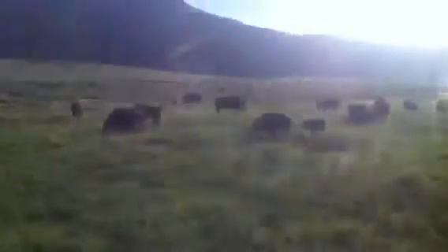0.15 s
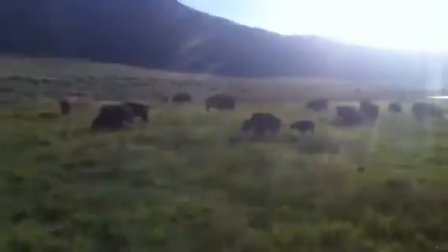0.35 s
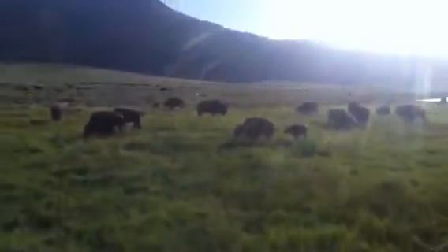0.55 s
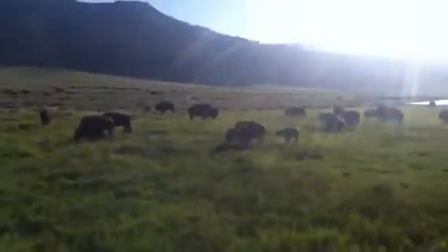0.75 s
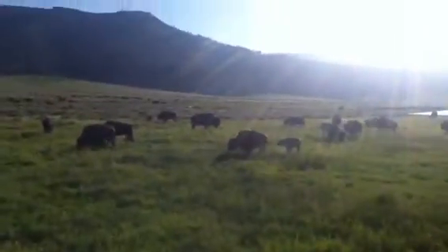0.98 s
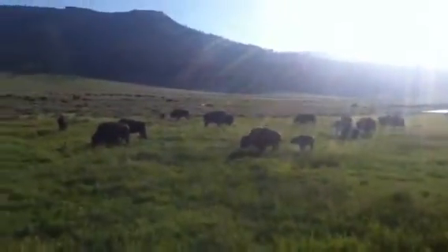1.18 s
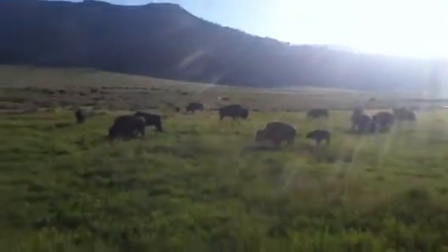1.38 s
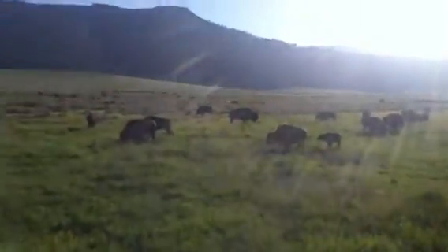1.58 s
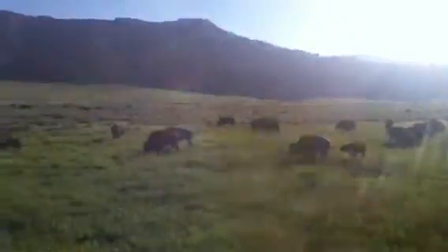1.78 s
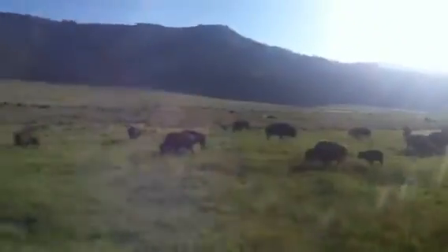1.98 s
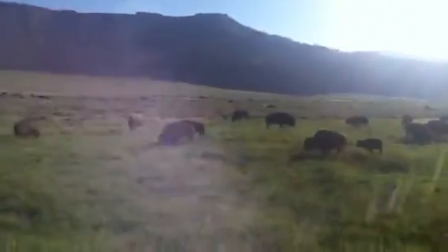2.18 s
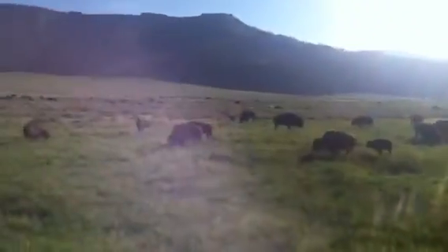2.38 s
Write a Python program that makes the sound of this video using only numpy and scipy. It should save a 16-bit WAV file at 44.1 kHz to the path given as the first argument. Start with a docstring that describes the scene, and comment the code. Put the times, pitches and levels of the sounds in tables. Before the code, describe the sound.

One deep, throaty grunt from a bison stands out on an open grassy plain. Soft bumps and faint rustles on the hand-held microphone come first, and a steady wind hiss carries on after the call.

```python
"""Open plain: a bison gives one low, rattling grunt over a steady hiss of wind in the grass.
Slow beats of its vocal folds set a deep airway resonance booming and crack through the throat;
mid-call the cracks double. Wind rumble, soft thumps and a little rustle reach the hand-held
microphone, and the recorder whines faintly."""
import sys
import numpy as np
from scipy import signal
from scipy.fft import rfft, irfft
from scipy.io import wavfile
from scipy.ndimage import uniform_filter1d

SR = 44100
rng = np.random.default_rng(int(sys.argv[2]) if len(sys.argv) > 2 else 0)


def file_out(sig):
    """Save sig as 16-bit WAV at sys.argv[1]."""
    # one column per channel
    cols = np.atleast_2d(sig).T
    # limit, then scale
    lim = np.clip(cols, -1, 1)
    pcm = np.round(lim * 32767).astype(np.int16)
    wavfile.write(sys.argv[1], SR, pcm)


N = 108045


def amp(db):
    """Decibels to gain."""
    return 10 ** (np.asarray(db) / 20)


def unit_rms(x):
    """Scale to an rms of one."""
    return x / np.sqrt(np.mean(x ** 2) + 1e-20)


def curve(points, t, column=1):
    """One column of a time table, interpolated at t."""
    rows = np.array(points)
    return np.interp(t, rows[:, 0], rows[:, column])


def colour(spectrum, hz):
    """Gain of a spectrum table at hz, interpolated over log frequency."""
    f, db = np.transpose(spectrum)
    return amp(np.interp(np.log(hz + 1), np.log(f + 1), db))


def noise(spectrum):
    """Steady coloured noise, unit rms."""
    white = rfft(rng.standard_normal(N))
    return unit_rms(irfft(white * colour(spectrum, np.fft.rfftfreq(N, 1 / SR)), N))


def ramp(u):
    """Smooth step from 0 to 1."""
    return np.sin(np.pi / 2 * np.clip(u, 0, 1)) ** 2


def swell(t, centre_s, db, half_s):
    """Gaussian envelope, down to 1/e at half_s from its peak."""
    return amp(db) * np.exp(-((t - centre_s) / half_s) ** 2)


def grass_wind(t):
    """Wind hisses in the grass; patches of its spectrum drift and the level flickers."""
    # hiss spectrum: f/Hz, level/dB
    spectrum = [(20, -18.5), (90, 3), (123, -7.5), (165, 2.5), (215, -3), (280, -6.5), (480, -12),
                (680, -10), (1020, -14.5), (1500, -17.5), (2800, -20), (4500, -25.5), (8000, -27.5),
                (11000, -32), (13500, -36), (15700, -41)]
    # wind strength: t/s, level/dB
    strength = [(0, -45), (.35, -44), (1.6, -44), (2.0, -45.5), (2.45, -45.5)]
    bands = signal.stft(noise(spectrum), nperseg=512, noverlap=384)[2]
    patches = uniform_filter1d(rng.standard_normal(bands.shape), size=9, axis=0)
    patch_db = 0.98 * unit_rms(uniform_filter1d(patches, size=24, axis=1))
    flicker_db = 0.95 * unit_rms(uniform_filter1d(rng.standard_normal(bands.shape[1]), size=10))
    hiss = signal.istft(bands * amp(patch_db + flicker_db), nperseg=512, noverlap=384)[1][:N]
    return unit_rms(hiss) * amp(curve(strength, t))


def wind_rumble(t):
    """Wind rumbles on the microphone."""
    # rumble spectrum: f/Hz, level/dB
    spectrum = [(20, -33), (50, 8), (85, 9), (140, 15.5), (220, -27), (1500, -89)]
    # rumble strength: t/s, level/dB
    strength = [(0, -63), (.3, -49), (.7, -45), (.82, -73), (1.0, -46.5), (1.35, -43), (1.7, -56.5),
                (2.45, -60)]
    return noise(spectrum) * amp(curve(strength, t))


def handling(t):
    """The hand on the microphone: dull pushes of a cycle or two, light rustles, one thin squeak."""
    # thumps: t/s, peak level/dB, f/Hz, half length/s
    pushes = [(.097, -32, 128, 0.0051), (.228, -28.5, 109, 0.0065), (.312, -30, 139, 0.0041),
              (.342, -23.5, 118, 0.0045), (0.353, -32, 65, 0.007), (0.471, -27.5, 73, 0.011),
              (0.691, -33, 116, 0.0054), (0.719, -28, 88, 0.0065), (0.901, -36, 102, 0.0052),
              (0.933, -31.5, 112, 0.0085), (0.953, -23.5, 126, 0.0033), (.988, -35, 98, 0.019),
              (1.05, -30, 90, 0.0097)]
    # rustles: t/s, level/dB, half length/s
    rustles = [(0.2, -58, .008), (0.23, -58, .007), (0.318, -50.5, 0.0037), (0.356, -52, 0.027),
               (0.434, -52.5, 0.018), (.635, -59, .008)]
    # rustle spectrum: f/Hz, level/dB
    spectrum = [(1000, -16), (3000, 3), (6700, 1), (9000, -1), (15000, -29)]
    thumps = sum(-swell(t, at_s, db, half_s) * np.cos(2 * np.pi * hz * (t - at_s))
                 for at_s, db, hz, half_s in pushes)
    rustle = noise(spectrum) * sum(swell(t, *row) for row in rustles)
    squeak = swell(t, centre_s=.355, db=-60, half_s=.028) * np.sin(2 * np.pi * 11902 * t)
    return thumps + rustle + squeak


def surroundings(x):
    """Add one close, inverted reflection and a short, thin scatter of echoes."""
    bounce_s, bounce_db = .0038, -11
    echo_rise_s, echo_t60_s, echo_db = .0051, .073, -16
    t = np.arange(SR // 2) / SR
    tail = rng.standard_normal(len(t)) * ramp(t / echo_rise_s) * amp(-60 * t / echo_t60_s)
    echoes = signal.fftconvolve(x, tail / np.linalg.norm(tail))[:N]
    bounce = np.r_[np.zeros(round(bounce_s * SR)), x][:N]
    return x - amp(bounce_db) * bounce + amp(echo_db) * echoes


def fold_closings():
    """Closing times of the vocal folds: the main beats, and the points halfway between."""
    # fold beat rate: t/s, f/Hz
    rate = [(1.0184, 40.8), (1.0664, 40.8), (1.0844, 18.7), (1.1014, 43), (1.16, 44.1), (1.22, 42.3),
            (1.28, 41.5), (1.325, 38.7), (1.36, 35.7), (1.44, 26)]
    t = np.arange(rate[0][0], rate[-1][0], 1 / SR)
    turns = np.cumsum(curve(rate, t)) / SR
    times_s = np.interp(np.arange(0, turns[-1], .5), turns, t)
    return times_s[::2], times_s[1::2]


def throat_response(size=16384):
    """One closing heard through the throat: a sharp crack that rings on in its resonances."""
    # broad throat spectrum: f/Hz, level/dB
    spectrum = [(150, -17), (350, -14), (550, -3), (650, 1), (1400, -4), (1580, -17), (1800, -9),
                (2200, -18), (2650, -14.5), (3100, -26), (3600, -19), (6000, -60)]
    # narrow resonances: f/Hz, lift/dB, width/Hz
    rings = [(473, 7, 40), (660, 5, 42), (716, 4, 22), (772, 6, 28), (895, 1, 12), (966, 8.5, 38),
             (1148, 4, 150), (1876, 7, 34), (2550, 5.5, 170)]
    hz = abs(np.fft.fftfreq(size, 1 / SR))
    lift_db = sum(db / (1 + (2 * (hz - centre) / width) ** 2) for centre, db, width in rings)
    log_gain = np.log(colour(spectrum, hz) * amp(lift_db))
    minimum_phase = np.exp(np.conj(signal.hilbert(log_gain)))
    response = np.fft.ifft(minimum_phase).real
    return response / abs(response).max()


def airway_boom(t, beats_s):
    """Each beat pulls the deep airway resonance toward its step; it rings until the next cuts in."""
    # airway resonance: t/s, f/Hz, level/dB
    resonance = [(.99, 151, -41), (1.03, 167, -33.5), (1.047, 162.5, -25), (1.08, 179, -21.5),
                 (1.115, 198, -30), (1.155, 188, -25.5), (1.185, 180, -30.5), (1.22, 191, -28),
                 (1.28, 190.2, -24), (1.335, 173, -28.5), (1.38, 167.7, -27.5), (1.425, 161.4, -30.5),
                 (1.465, 138, -37)]
    # phase reset by a beat: t/s, share/0-1
    grip = [(1.125, 1), (1.145, .1), (1.195, .15), (1.215, 1)]
    rise_s, fall_s, t60_s, lead_s, lowpass_hz = .015, .015, .35, .0043, 272
    turns = np.cumsum(curve(resonance, t)) / SR
    # one extra beat at each end
    edges_s = np.r_[2 * beats_s[0] - beats_s[1], beats_s, 2 * beats_s[-1] - beats_s[-2]] - lead_s
    boom, lag_turns = np.zeros(N), 0
    for start, end in zip(edges_s, edges_s[1:]):
        gate = ramp((t - start) / rise_s) * ramp(1 - (t - end) / fall_s)
        decay = amp(-60 * np.maximum(t - start, 0) / t60_s)
        slip_turns = (np.interp(start, t, turns) - lag_turns + .5) % 1 - .5
        lag_turns += curve(grip, start) * slip_turns
        boom += gate * decay * np.sin(2 * np.pi * (turns - lag_turns))
    boom *= np.sqrt(2) * amp(curve(resonance, t, column=2))
    return signal.sosfiltfilt(signal.butter(4, lowpass_hz, fs=SR, output="sos"), boom)


def throat_rasp(t, beats_s, halfway_s):
    """Snapping folds and puffs of air excite the throat; at the call's height the puffs fizz."""
    # sharpness of the main closings: t/s, relative level/dB
    sharpness = [(1.018, -5), (1.043, -3), (1.068, -10), (1.101, -1.5), (1.124, -13), (1.147, 3.5),
                 (1.17, -5), (1.193, 0), (1.216, -6), (1.24, -2), (1.264, -4), (1.288, -11), (1.313, -5),
                 (1.339, -9), (1.366, -1.5), (1.395, -20)]
    # extra closings halfway between: t/s, relative level/dB
    doubling = [(1.03, -19), (1.08, -11), (1.113, -16), (1.159, -6), (1.181, -2), (1.228, -.5),
                (1.252, -1.5), (1.276, -11), (1.3, -19)]
    # air rushing through the throat: t/s, level/dB
    airflow = [(.96, -77), (.99, -53), (1.15, -48.5), (1.29, -46), (1.38, -54.5), (1.42, -72)]
    # dry fizz spectrum: f/Hz, level/dB
    fizz_spectrum = [(2000, -35), (2500, 10), (2900, 7), (3700, -38)]
    jitter_s, puff_decay_s, puff_depth, crack_gain_db = .00005, .005, 1.4, -25
    clicks = np.zeros(N)
    for times_s, levels in ((beats_s, sharpness), (halfway_s, doubling)):
        uneven_s = times_s + jitter_s * rng.standard_normal(len(times_s))
        clicks[np.round(uneven_s * SR).astype(int)] = amp(curve(levels, times_s))
    puffs = signal.lfilter([1], [1, -np.exp(-1 / (puff_decay_s * SR))], clicks)
    breath = amp(curve(airflow, t)) * (t > airflow[0][0]) * (t < airflow[-1][0])
    air = rng.standard_normal(N) * (1 + puff_depth * puffs) * breath
    fizz = noise(fizz_spectrum) * puffs * swell(t, centre_s=1.245, db=-48.5, half_s=.035)
    response = throat_response()
    drive = air / np.linalg.norm(response) - amp(crack_gain_db) * clicks
    return signal.fftconvolve(drive, response)[:N] + fizz


def bison(t):
    """The grunt: deep boom and throaty rasp on the same fold beats."""
    beats_s, halfway_s = fold_closings()
    return airway_boom(t, beats_s) + surroundings(throat_rasp(t, beats_s, halfway_s))


def scene():
    """Bison, wind and handling noise, mono."""
    t = np.arange(N) / SR
    return (bison(t) + grass_wind(t) + wind_rumble(t) + handling(t))[None]


def record(dry):
    """The recorder adds faint electronic whines and limits the band."""
    # steady whines: f/Hz, rms level/dB
    tones = [(2882, -74), (14994, -77)]
    edge_hz = 15740
    t = np.arange(N) / SR
    whine = sum(amp(db) * np.sqrt(2) * np.sin(2 * np.pi * hz * t) for hz, db in tones)
    lowpass = signal.firwin(1023, edge_hz, window=("kaiser", 9), fs=SR)
    return signal.oaconvolve(dry + whine, lowpass[None], "same")


dry = scene()
out = record(dry)
file_out(out)
```